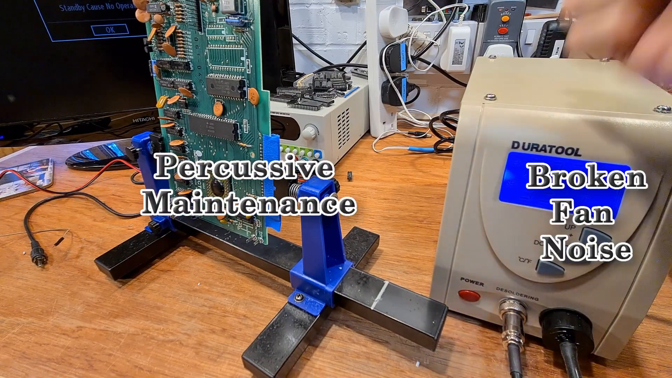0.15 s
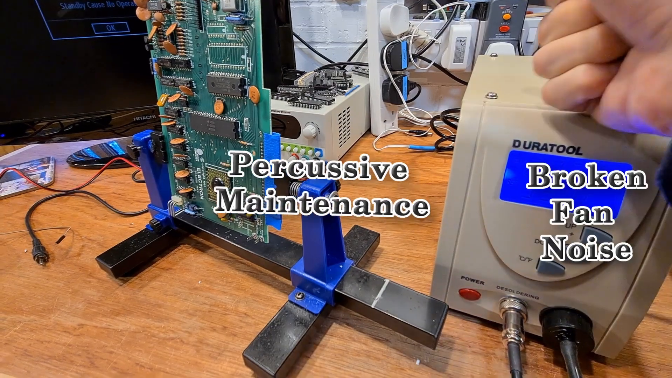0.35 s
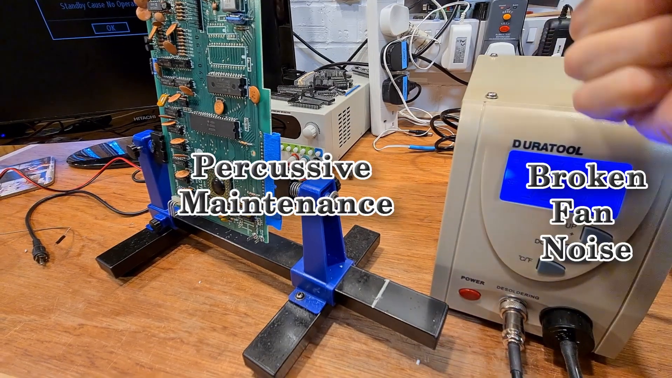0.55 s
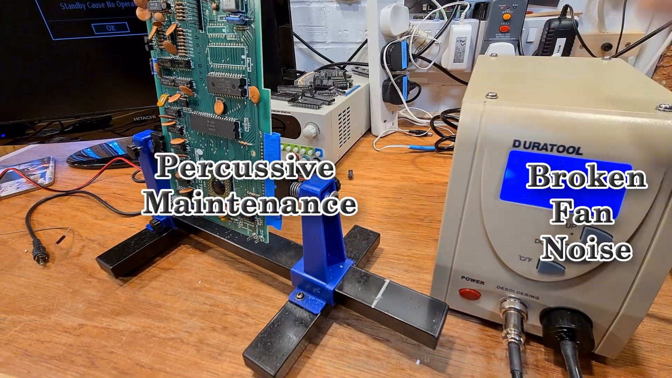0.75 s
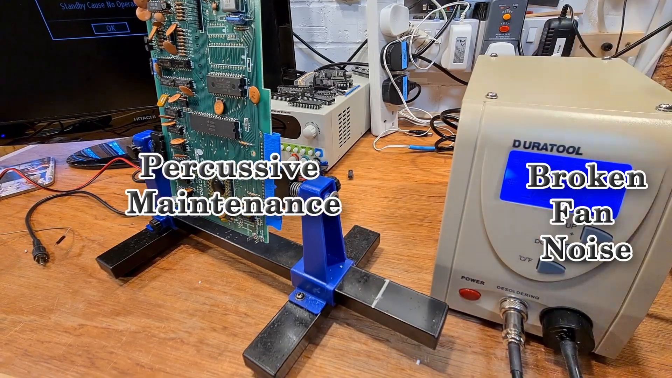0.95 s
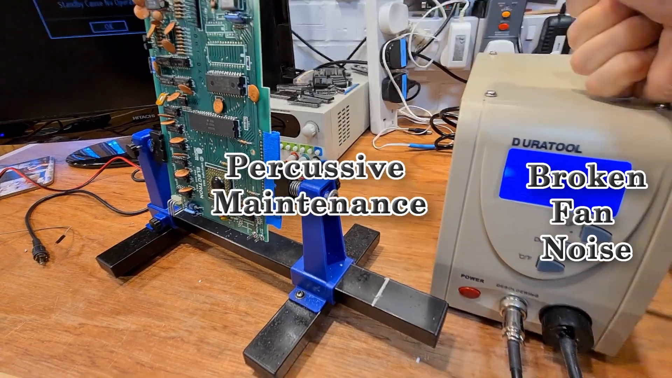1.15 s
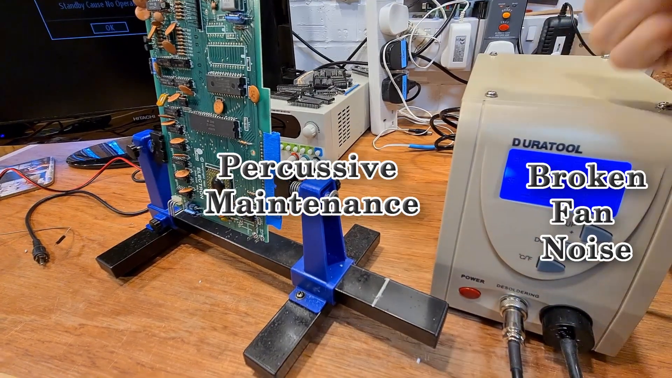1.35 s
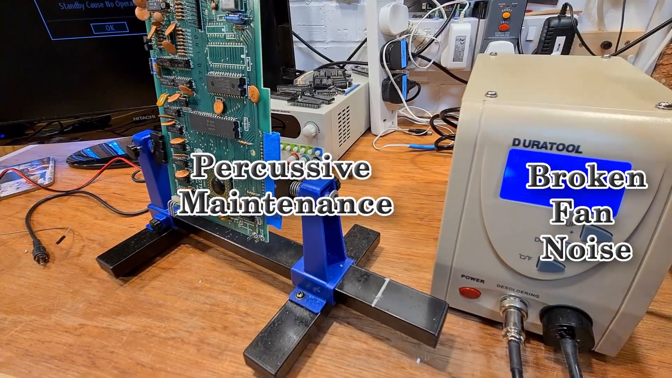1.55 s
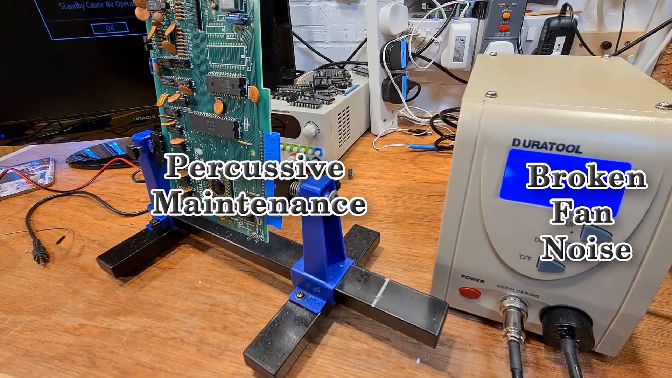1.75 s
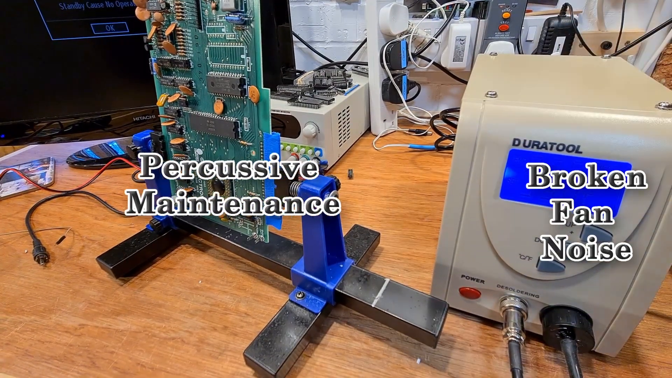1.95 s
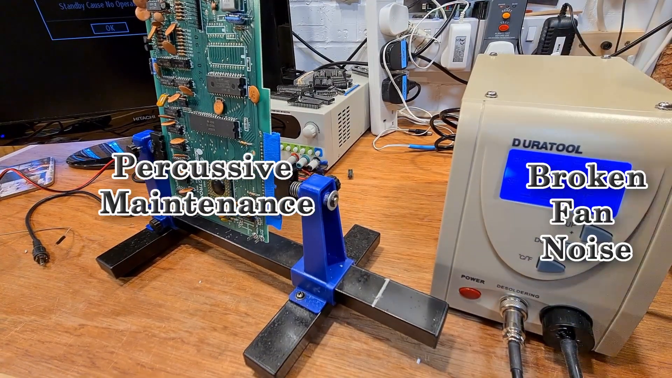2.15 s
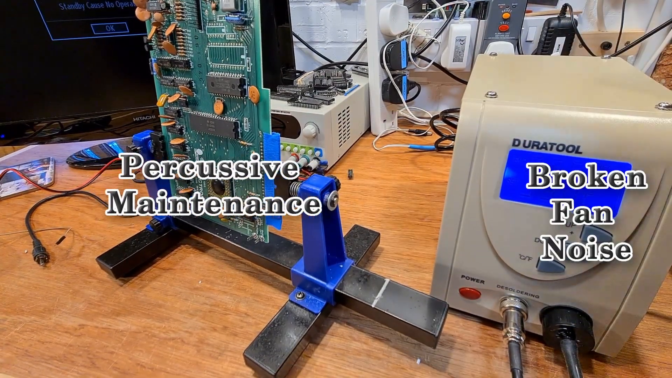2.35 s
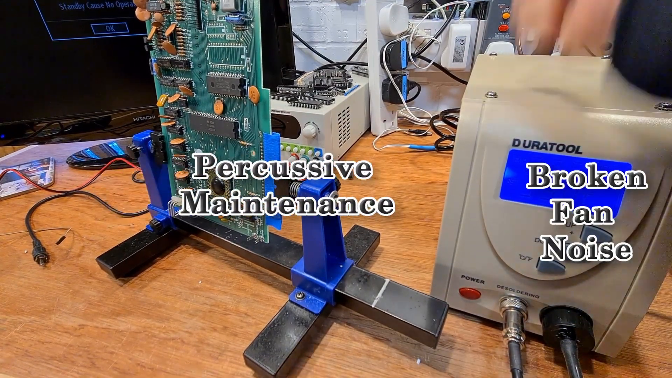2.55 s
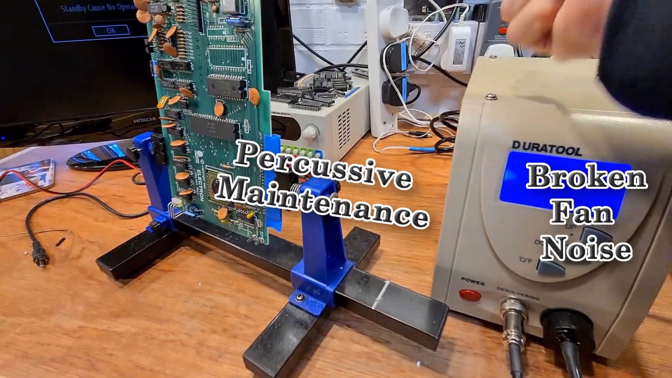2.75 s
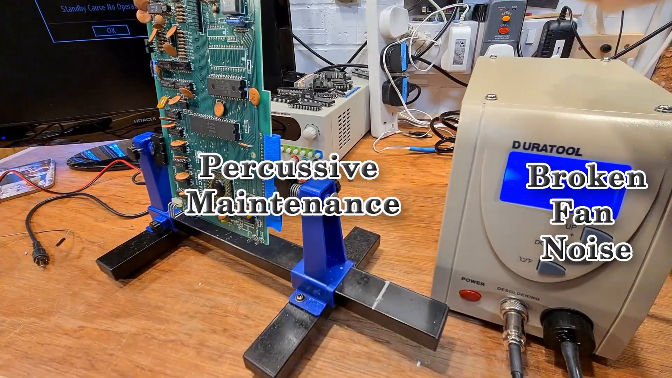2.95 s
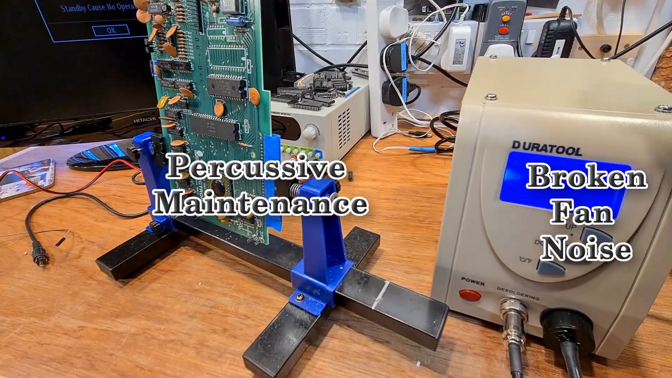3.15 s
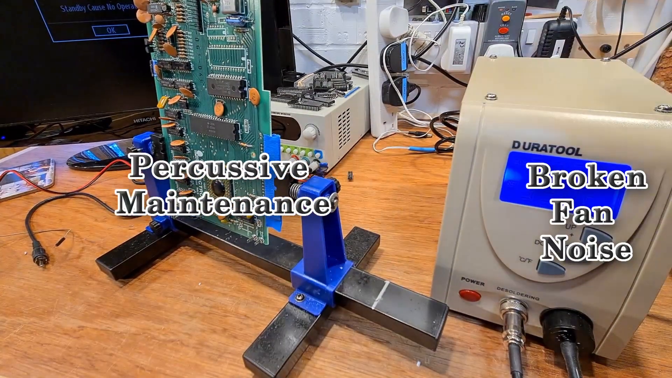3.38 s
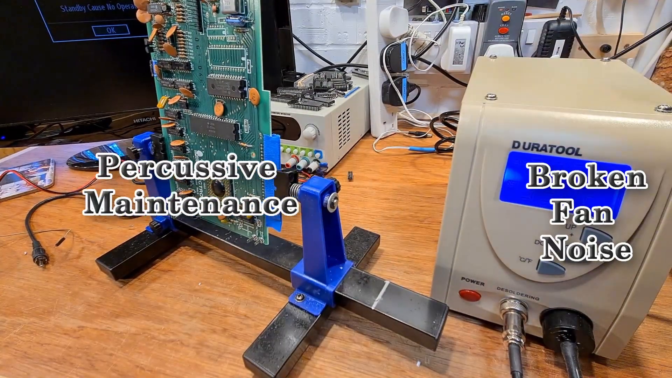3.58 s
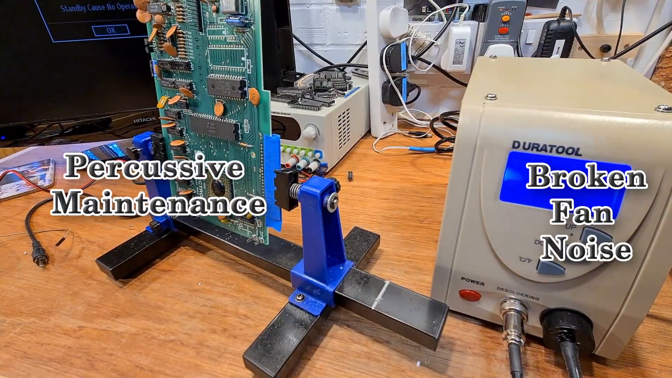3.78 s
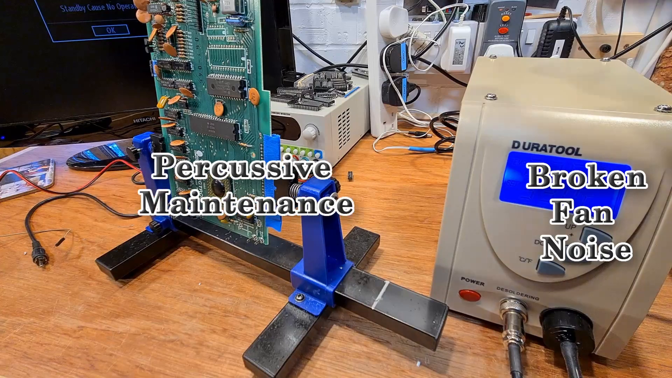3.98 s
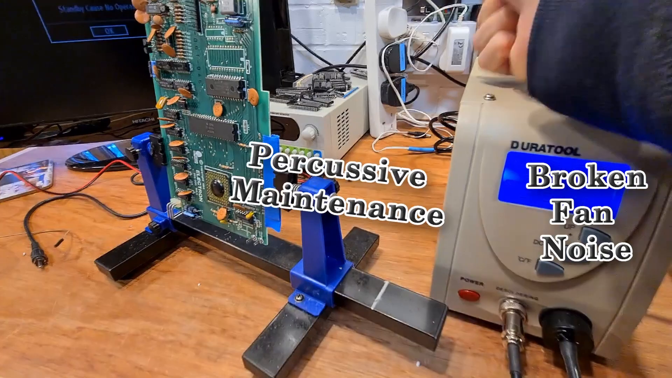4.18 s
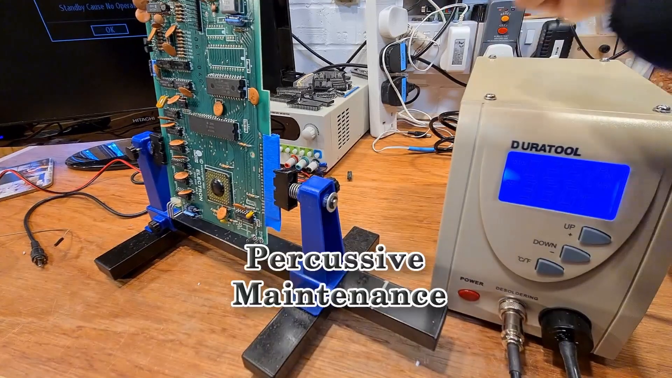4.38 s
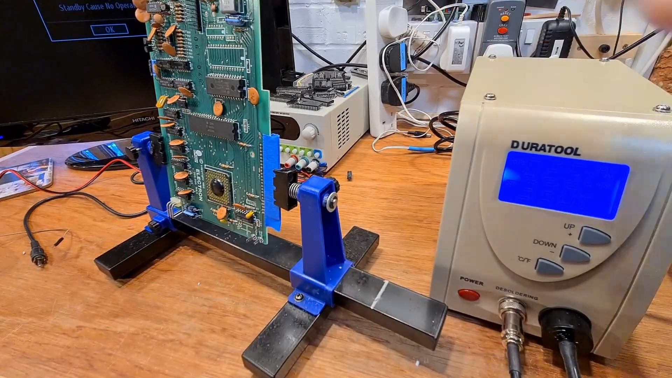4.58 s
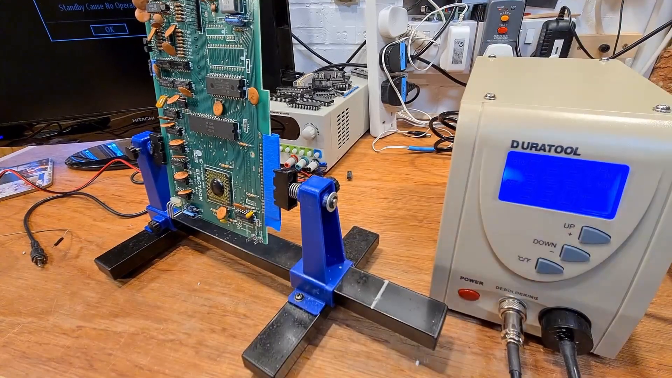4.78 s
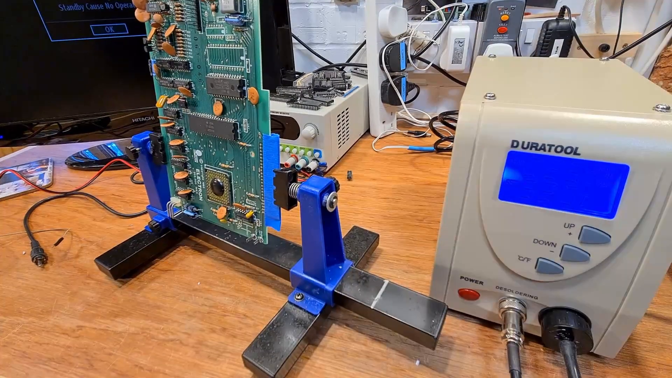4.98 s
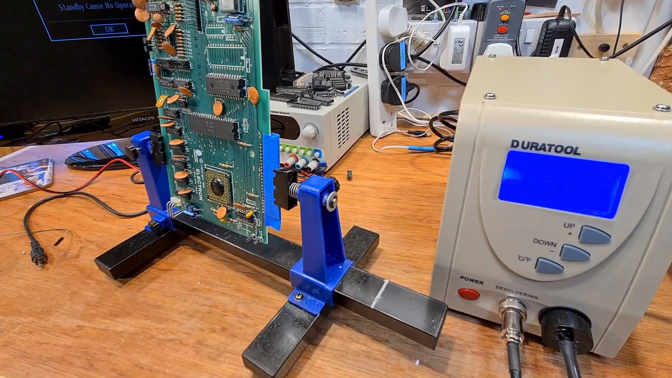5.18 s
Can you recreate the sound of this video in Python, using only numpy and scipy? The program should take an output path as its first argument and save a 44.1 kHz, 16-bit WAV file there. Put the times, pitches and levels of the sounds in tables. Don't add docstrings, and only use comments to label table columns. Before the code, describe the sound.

A worn fan runs throughout inside a sheet-metal case on a wooden bench, heard close in stereo in a small, dry room. It makes a steady, nearly pure low drone around 215 Hz, topped by a raspy, wavering bearing buzz and fine hiss. At about 0.3 s a fist gives a light knock: short thud, metal tick, brief rattle, and the drone sags slightly. At 1.2 s a harder blow brings a hollow bang, ringing sheet metal and a longer clatter of loose parts; the pitch dips quickly and climbs back. At 2.7 s another thump rings the panel and drags the rotor longer; a very faint engine note sinks away around 3.0 to 3.6 s. At 4.2 s comes the heaviest thud with bench boom and rattle. The fan slows, then recovers, still buzzing until the end at about 5.2 s. Faint low room rumble lies underneath.

```python
import sys
import numpy as np
from scipy import signal
from scipy.fft import rfft, irfft
from scipy.io import wavfile

SR = 44100
rng = np.random.default_rng(int(sys.argv[2]) if len(sys.argv) > 2 else 0)


def ratio_of_db(decibels):
    return 10 ** (np.asarray(decibels, float) / 20)


def persist_wave(psi):
    counts = np.round(np.clip(psi, -1, 1) * 32767).astype(np.int16)
    wavfile.write(sys.argv[1], SR, np.atleast_2d(counts).T)


N = 230290
TIME = np.arange(N) / SR
SIDE = np.array([[1], [-1]]) / 2
STEADY_TOP_HZ = 15780


def rms_one(x):
    return x / np.sqrt(np.mean(x ** 2) + 1e-20)


def in_time(rows):
    s, *columns = np.transpose(rows)
    return [np.interp(TIME, s, c) for c in columns]


def at_hz(points, hz):
    point_hz, value = np.transpose(points)
    return np.interp(np.log(hz + 1), np.log(point_hz), value)


def colour(x, gain):
    return irfft(rfft(x) * gain(np.arange(N // 2 + 1) * SR / N), N)


def drift(rate):
    r = np.exp(-80 * np.pi * rate / SR)
    noise = rng.standard_normal(N // 40 + 2002)
    slow = signal.lfilter([1], [1, -2 * r, r * r], noise)[2000:]
    return np.interp(np.arange(N) / 40, np.arange(len(slow)), rms_one(slow))


def ring(clicks, hz, t60):
    r, w = ratio_of_db(-60 / (t60 * SR)), 2 * np.pi * hz / SR
    return signal.lfilter([0, np.sin(w)], [1, -2 * r * np.cos(w), r * r], clicks + 1e-18)


def resonance(x, hz, width):
    r = np.exp(-np.pi * width / SR)
    top = np.array([1, 0, -1]) * (1 - r * r) / 2
    return signal.lfilter(top, [1, -2 * r * np.cos(2 * np.pi * hz / SR), r * r], x)


def scatter(x, t60):
    t = np.arange(8000) / SR
    tails = rng.standard_normal((2, len(t))) * ratio_of_db(-60 * t / t60)
    tails /= np.sqrt(np.sum(tails ** 2, axis=1, keepdims=True))
    return signal.fftconvolve(x[None], tails, axes=1)[:, :N]


def peaks(events, rise, fall):
    t = np.arange(0, N + 64, 64) / SR
    gain = sum(ratio_of_db(db - np.maximum(rise * (s - t), fall * (t - s))) for s, db in events)
    return np.interp(TIME, t, gain)


# (frequency [Hz], density [dB per Hz])
FLOOR = [(25, -22), (60, 2.5), (120, -8), (170, 9), (260, 2.5), (310, 6.5), (345, -20), (385, -42),
         (440, -21), (540, -14), (650, -22), (900, -18), (1500, -11.5)]


def air():
    noise = rng.standard_normal((3, N))
    heard = noise[0] + 0.76 * noise[1:]
    return ratio_of_db(-50) * rms_one(colour(heard, lambda hz: ratio_of_db(at_hz(FLOOR, hz)) * (hz < 3000)))


# (time [s], pitch [Hz], level [dB])
ENGINE = [
    (2.9, 65, -65),
    (3.0, 64, -46),
    (3.15, 63.4, -44),
    (3.4, 58.1, -52.5),
    (3.65, 56, -62),
]


def far_engine():
    (first_s, first_hz, _), (last_s, last_hz, _) = ENGINE[0], ENGINE[-1]
    hz, level_db = in_time([(0, first_hz, -99), *ENGINE, (last_s + .2, last_hz, -99)])
    return np.sqrt(2) * ratio_of_db(level_db) * np.sin(2 * np.pi * np.cumsum(hz) / SR)


# (frequency [Hz], width [Hz], level [dB])
BENCH_MODES = [(39.5, 16.5, -7.5), (62.5, 7.1, 2), (76, 26, -7.5)]
# (time [s], level [dB])
STEPS = [(.1, -53), (.62, -54), (.9, -55), (1.5, -52), (1.95, -56), (2.2, -63), (2.4, -56), (2.9, -43),
         (4.05, -57), (4.36, -42), (5.1, -49)]


def bench(boom_attack_s=0.019, hum_db=-58.5, sway_db=3.0):
    shake = rng.standard_normal((2, N))
    shake[1] = shake[0] + 0.58 * shake[1]
    boom = 0
    for hz, width, db in BENCH_MODES:
        once = resonance(shake, hz, width * 1.85)
        boom = boom + ratio_of_db(db) * resonance(once, hz, width * 1.85)
    fist_booms = [(row[0] + boom_attack_s, fist[4]) for row, fist in zip(BRAKING, FISTS)]
    struck = np.minimum(peaks(fist_booms, rise=1500., fall=144), ratio_of_db(-20))
    footfalls = peaks(STEPS, rise=155, fall=107)
    hum = ratio_of_db(hum_db + sway_db * drift(4.0))
    return (struck + footfalls + hum) * rms_one(colour(boom, lambda hz: hz > 28))


# (frequency [Hz], density [dB per Hz])
RATTLE_COLOUR = [(400, -8), (700, -6.5), (1900, -0.5), (3300, -7.5), (4600, -12.5), (7500, -7), (8500, -45),
                 (11000, -11), (15500, -34)]
# (lid over panel [dB], rattle [dB], rattle length [s], rattle fade [dB], bench boom [dB])
FISTS = [
    (0.5, -37.5, 0.047, 1, -22.5),
    (5.5, -24.5, 0.12, 17.5, -19.5),
    (-7, -26, 0.072, 7.5, -22),
    (-3, -26.5, 0.0814, 3, -17.5),
]


def rattle(attack_s=0.018, release_s=0.024):
    rows = []
    for (s, *_), (_, db, length, fade_db, _) in zip(BRAKING, FISTS):
        rows += [(s - .001, -85), (s + 0.0018, db - 4.5), (s + attack_s, db)]
        end = s + length
        rows += [(end, db - fade_db), (end + release_s, -62), (end + .08, -75)]
    hits = rng.random((3, N)) < 900. / SR
    force = ratio_of_db(3.0 * np.minimum(rng.exponential(1, (3, N)), 4))
    clicks = hits * force * rng.choice([-1, 1], (3, N))
    shake = 0.37 * clicks[0] + clicks[1:]
    shake = colour(shake, lambda hz: ratio_of_db(at_hz(RATTLE_COLOUR, hz)) * (hz < STEADY_TOP_HZ))
    return ratio_of_db(in_time(rows)[0] - 2.5) * rms_one(shake)


# (time [s], tick peak [dB], thud [dB], sheet ring [dB], tick pitch [Hz])
BLOWS = [(0.311, -17, -15, -32, 3020), (0.3204, -46, -15, -39, 2340), (0.333, -33, -41, -47, 3150),
         (0.3407, -30, -18.5, -39, 12100), (0.346, -25, -17.5, -47, 4100), (1.2039, -23, -5, -24.5, 2400),
         (1.2134, -13, -9.5, -14.5, 3570), (1.229, -24, -15, -47, 4800), (1.2392, -23, -22, -30, 4470),
         (1.2458, -30, -21, -31, 4660), (1.2555, -20, -15.5, -34, 2010), (1.277, -28.5, -22.5, -42, 4620),
         (2.6954, -16, -4.5, -27, 2670), (2.707, -17.5, -12, -25.5, 1940), (2.7202, -21, -21, -31, 2980),
         (2.7337, -24, -9.5, -35, 2900), (2.7523, -15.5, -12, -39, 4960), (2.7667, -27.5, -28, -42, 4350),
         (4.1818, -8.5, 2, -20.5, 3420), (4.1906, -33, -4.5, -28, 3420), (4.2073, -20, -24, -23, 2060),
         (4.2273, -15, -9.5, -28, 7200), (4.2411, -24, -34, -31.5, 4460), (4.2588, -20.5, -16.5, -38, 4500)]


def ticks():
    out, t = np.zeros(N), np.arange(600) / SR
    for s, peak_db, _, _, hz in BLOWS:
        burst = rng.standard_normal(len(t)) * ratio_of_db(-60 * t / 0.0069)
        ringing = resonance(burst, hz, 930.0)
        out[int(s * SR):][:len(t)] += ratio_of_db(peak_db - 4) * (0.58 * burst + 3.74 * ringing)
    return signal.sosfilt(signal.butter(2, 1500., "high", fs=SR, output="sos"), out)


def strike(modes, levels_db, soft_hz, spread_db):
    at, out = (np.array(BLOWS)[:, 0] * SR).astype(int), np.zeros(N)
    luck = rng.standard_normal((len(at), len(modes), 2))
    for k, (hz, mode_db, t60) in enumerate(modes):
        clicks = np.zeros(N)
        push = ratio_of_db(levels_db + mode_db + spread_db * luck[:, k, 0])
        clicks[at] = push * np.sign(luck[:, k, 1] + .5)
        out += ring(clicks, hz, t60)
    return signal.sosfilt(signal.butter(2, soft_hz, fs=SR, output="sos"), out)


# (frequency [Hz], level [dB], t60 [s])
BOX = [(41.7, -15.5, 0.41), (67.4, -5.5, 0.18), (106, -12.5, 0.17), (154.6, -15, 0.16),
       (195.1, -4.5, 0.124), (235.8, -2.5, 0.13), (266, -9, 0.093), (314.4, -3.5, 0.11),
       (390.8, -6.5, 0.071)]
# (frequency [Hz], level [dB], t60 [s])
PANEL = [(459, -5, 0.16), (544, 2, 0.077), (674, -9, 0.099), (730, -1.5, 0.11), (784, -0.5, 0.11),
         (888, -6, 0.059)]
# (frequency [Hz], level [dB], t60 [s])
LID = [(1076, 3, 0.06), (1144, 0.5, 0.063), (1227, -11, 0.052), (1290, 3, 0.057), (1410, -26, 0.15),
       (1760, -8, 0.058), (1964, -11, 0.16), (2130, -21, 0.031)]


def fist_blows():
    s, _, thud_db, sheet_db, _ = np.transpose(BLOWS)
    fist = np.searchsorted(np.array(BRAKING)[1:, 0] - .1, s)
    tilt_db = np.array(FISTS)[fist, 0] / 2
    thud = strike(BOX, thud_db - 4.0, soft_hz=585.0, spread_db=1.0)
    panel = strike(PANEL, sheet_db - tilt_db - 0.5, soft_hz=2470.0, spread_db=3.5)
    lid = strike(LID, sheet_db + tilt_db - 3.0, soft_hz=4020.0, spread_db=6.0)
    tick = ticks()
    blows = thud + ratio_of_db(-7) * resonance(scatter(thud, t60=0.069), 370.0, 200.0)
    blows += ratio_of_db(-3.5) * panel + ratio_of_db(-15.5) * scatter(panel, t60=0.015)
    blows += ratio_of_db(-14) * scatter(panel + lid, t60=0.19)
    blows += ratio_of_db(-4.0) * lid * [[-.6], [1]] + ratio_of_db(-10) * scatter(lid, t60=0.04)
    clatter = ratio_of_db(-9.0) * tick + ratio_of_db(-4.0) * scatter(tick, t60=0.028)
    clatter = clatter + ratio_of_db(6) * scatter(tick, t60=0.036) + rattle()
    return blows + ratio_of_db(6.2 * SIDE) * clatter


# (time [s], quick whirl loss [Hz], lasting whirl loss [Hz],
# chatter loss [Hz], chatter rebound [Hz])
BRAKING = [
    (0.31, 10.45, 4.94, 299.17, 220.27),
    (1.2, 16.64, 8.25, 533.99, 362.5),
    (2.7, 12.8, 14.5, 608.05, 395.05),
    (4.18, 9.2, 15.42, 536.97, 345.93),
]
BRAKE_S = .02


def after(losses, return_s):
    since = np.maximum(TIME - np.array(BRAKING)[:, :1], 0)
    return losses @ ((1 - np.exp(-since / BRAKE_S)) * np.exp(-since / return_s))


WHIRL_HZ, CHATTER_HZ = 214.92, 1546.4
# (time [s], tone [dB], buzz [dB])
SHAKE = [
    (0, -31, -42.5),
    (.5, -32, -44),
    (1.1, -30.5, -43),
    (1.7, -30, -40.5),
    (2.6, -30.5, -42.5),
    (3.3, -30.5, -41),
    (4.1, -31, -43),
    (4.6, -30.5, -41.5),
    (5.22, -32, -41),
]


def rotor():
    quick, lasting, loss, rebound = np.transpose(BRAKING)[1:]
    whirl_hz = WHIRL_HZ - after(quick, return_s=.218) - after(lasting, return_s=.824)
    chatter_hz = CHATTER_HZ - after(loss, return_s=.237) + after(rebound, return_s=.374)
    tone_db, buzz_db = in_time(SHAKE)
    tone_db = tone_db + 0.0269 * (WHIRL_HZ - whirl_hz)
    buzz_db = buzz_db + 0.0086 * (chatter_hz - CHATTER_HZ)
    return np.cumsum(whirl_hz) / SR, np.cumsum(chatter_hz) / SR, tone_db, buzz_db


def whirl_tone(cycles, tone_db):
    level_db = tone_db - 0.45 + 0.33 * drift(23.0) + 3.2 * SIDE
    return np.sqrt(2) * ratio_of_db(level_db) * np.sin(2 * np.pi * cycles + 0.17 * SIDE)


# (chatter multiple, whirl multiple, level re tone [dB], left-right [dB])
MIXED_LINES = [(0, 2, -33, 4), (0, 5, -39, -3), (0, 6, -33, -5), (0, 7, -36, -3), (0, 9, -26, 1),
               (0, 10, -32, -1), (0, 11, -32, 7), (0, 13, -30, 0), (0, 14, -27, 3), (0, 17, -27, 11),
               (0, 19, -29, 5), (0, 22, -30, 6), (1, 0, -24, 0), (1, 2, -26, 2), (1, 4, -27, 6),
               (1, 6, -27, -3), (1, 7, -27, 2), (1, 8, -26, 5), (1, 10, -33, 12), (1, 11, -27, 0),
               (1, 12, -26, 9), (1, 13, -24, 11), (1, 14, -24, 2), (1, 15, -24, 5), (1, 18, -28, 6),
               (2, 1, -29, 3), (2, 4, -27, 3), (2, 6, -27, 5), (2, 7, -23, 11), (2, 8, -30, 6)]
# (frequency [Hz], left lead [rad])
LINE_LEAD = [(420, -0.6), (1300, -1.4), (1560, -2.5), (1950, -2), (2400, -4.5), (2850, -5.5), (3200, -5),
             (5500, -5.5)]
# (frequency [Hz], gain [dB])
LINE_PASS = [(370, -4), (402, 5), (422, -12), (900, -14), (1010, -8), (1060, 0), (1170, -18), (1235, -9),
             (1275, 1), (1400, 0), (6000, 0)]


def sleeve_lines(cycles, chatter, tone_db):
    out = 0
    for k, n, level_db, pan_db in MIXED_LINES:
        lead = at_hz(LINE_LEAD, k * CHATTER_HZ + n * WHIRL_HZ)
        slip = 0.19 * rng.standard_normal() + 0.078 * drift(4.8)
        phase = 2 * np.pi * (k * chatter + n * cycles + slip) + lead * SIDE
        out = out + ratio_of_db(level_db + 3.08 * drift(5.2) + pan_db * SIDE) * np.cos(phase)
    lost_hz = WHIRL_HZ - np.gradient(cycles) * SR
    lines = np.sqrt(2) * ratio_of_db(tone_db + 1.0 - 0.1113 * lost_hz) * out
    return colour(lines, lambda hz: ratio_of_db(at_hz(LINE_PASS, hz)))


# (place in cycle [0-1], strength [dB], chance [0-1])
CONTACTS = [
    (0.02, -12.5, 0.9),
    (0.5, -10, 0.3),
    (1, -10, 0.7),
    (.15, -4.5, .5),
]
# (frequency [Hz], density [dB per Hz])
BUZZ = [(540, -17.5), (930, -27), (1250, -28), (1600, -11.5), (2600, -10), (3400, -11), (4500, -6),
        (5600, -6.5), (6400, -12), (7600, -10.5), (8400, -18), (9600, -12.5), (10200, -12), (15600, -3)]
# (frequency [Hz], width [Hz], lift [dB])
BUZZ_PEAKS_DIPS = [(736, 13.6, 16.5), (539, 6.4, 10.5), (2090, 33, 7.5), (3093, 67, 8), (3278, 37, 11),
                   (3330, 49, -1.5), (3883, 72, 8), (4350, 45, 5), (4620, 370, 5.5), (4840, 89, 4.5), (5463, 9, 15),
                   (6860, 850, 6.5), (7720, 110, 6),
                   (945, 84, -22), (2640, 50, -1), (6140, 140, -18), (8020, 370, -20), (8930, 140, -13),
          (9520, 270, -15), (10730, 280, 4.5), (12620, 220, 8.5), (13100, 430, -15)]
# (frequency [Hz], left-right [dB])
BUZZ_BALANCE = [(500, 0), (1200, 0.5), (2500, 0.5), (5000, 1), (12000, 5)]
# (frequency [Hz], left-right likeness [0-1])
BUZZ_LIKENESS = [(500, 0.27), (1200, 0.088), (2500, 0.35), (5000, 0.27), (12000, 0.076)]


def bearing_buzz(cycles, chatter, buzz_db, hiss_db=-3, jitter_s=.00012):
    taps, turns = np.zeros((3, N)), np.arange(int(cycles[-1]))
    for place, strength_db, chance in CONTACTS:
        luck = rng.standard_normal((5, 1500))[:, :len(turns)]
        at = np.interp(turns + place, cycles, np.arange(N)) + jitter_s * SR * luck[0]
        at = np.clip(at, 0, N - 1).astype(int)
        touches = rng.random(1500)[:len(turns)] < chance
        meeting_db = 1.0 * np.cos(2 * np.pi * chatter[at])
        force = touches * ratio_of_db(strength_db + meeting_db + 0.86 * luck[1])
        taps[:, at] += force * np.sign(luck[2:])
    taps = colour(rms_one(taps), lambda hz: 1 / np.sqrt(1 + (hz / 2900.0) ** 4) + 0.28)
    rub = taps + ratio_of_db(hiss_db + 0.19 * drift(30)) * rng.standard_normal((3, N))
    for hz, width, lift_db in BUZZ_PEAKS_DIPS:
        rub = rub + (ratio_of_db(lift_db) - 1) * resonance(rub, hz, width)
    direct, *own = colour(rub, lambda hz: ratio_of_db(at_hz(BUZZ, hz)) * (hz < STEADY_TOP_HZ))

    def alike(hz):
        return np.clip(at_hz(BUZZ_LIKENESS, hz), 0, 1)

    ports = []
    for sign, apart in zip((1, -1), own):
        mix = colour(direct, lambda hz: np.sqrt(alike(hz)))
        mix = mix + colour(apart, lambda hz: np.sqrt(1 - alike(hz)))
        ports.append(colour(mix, lambda hz: ratio_of_db(sign * at_hz(BUZZ_BALANCE, hz) / 2)))
    return ratio_of_db(buzz_db + 2.5) * rms_one(np.array(ports))


def scene():
    cycles, chatter, tone_db, buzz_db = rotor()
    out = air() + far_engine() + bench() + fist_blows()
    out = out + whirl_tone(cycles, tone_db) + bearing_buzz(cycles, chatter, buzz_db)
    out[0] = np.roll(out[0], 10)
    return out + sleeve_lines(cycles, chatter, tone_db)


def band_limit(x):
    return signal.sosfilt(signal.butter(12, 16670, fs=SR, output="sos"), x)


def record(dry):
    rounded = np.tanh(dry / 1.114) * 1.104
    cut = signal.sosfilt(signal.cheby2(12, 70, 16700, fs=SR, output="sos"), rounded)
    cut = signal.sosfilt(signal.butter(4, 34., "high", fs=SR, output="sos"), cut)
    return band_limit(np.clip(cut, -1, 1))


dry = scene()
out = record(dry)
persist_wave(out)
```